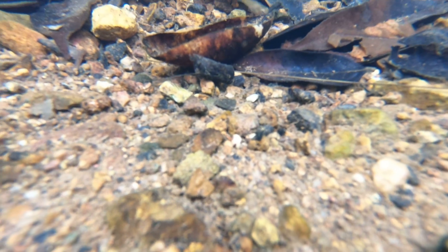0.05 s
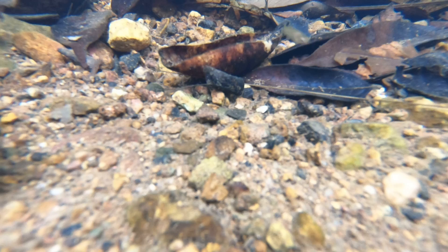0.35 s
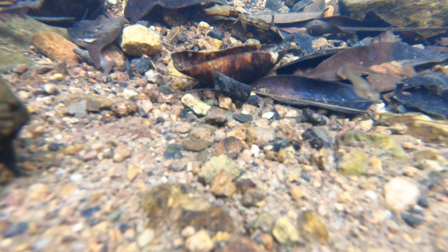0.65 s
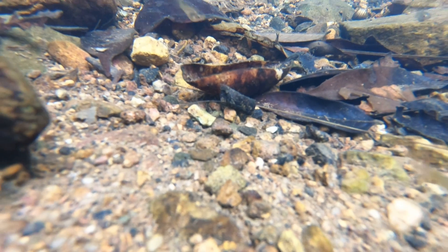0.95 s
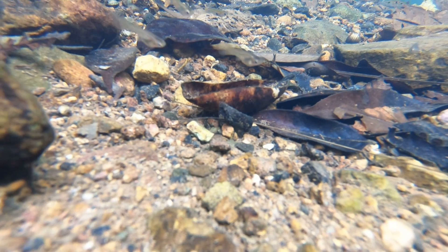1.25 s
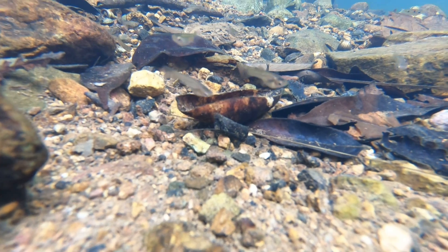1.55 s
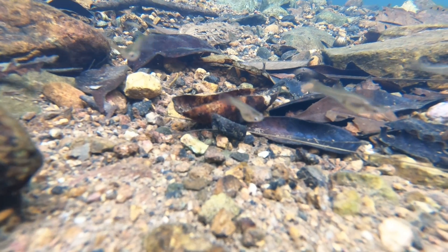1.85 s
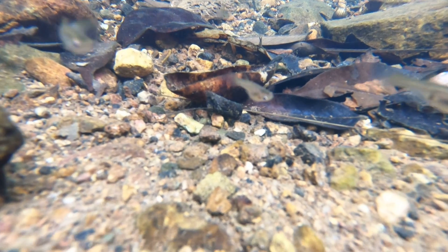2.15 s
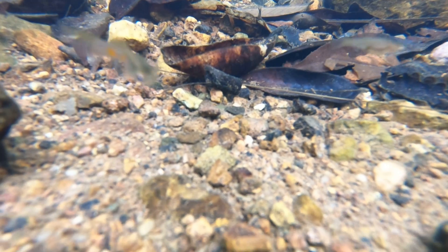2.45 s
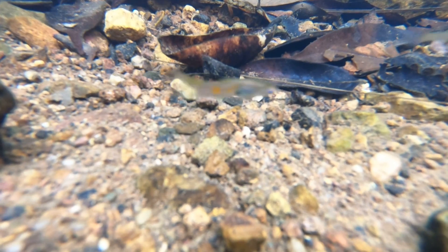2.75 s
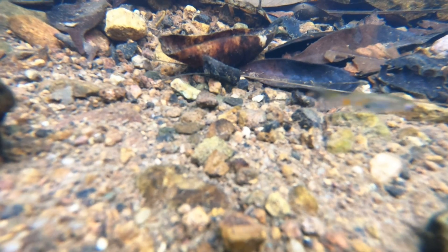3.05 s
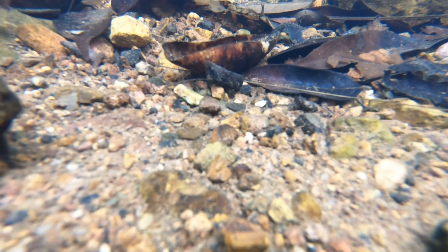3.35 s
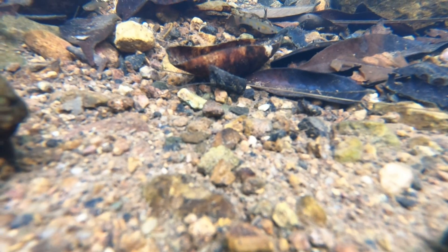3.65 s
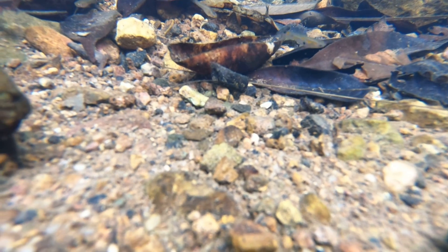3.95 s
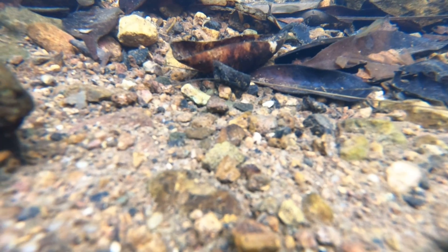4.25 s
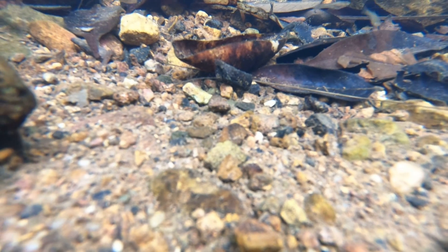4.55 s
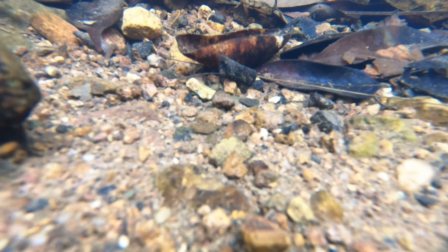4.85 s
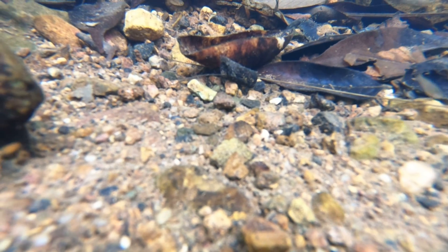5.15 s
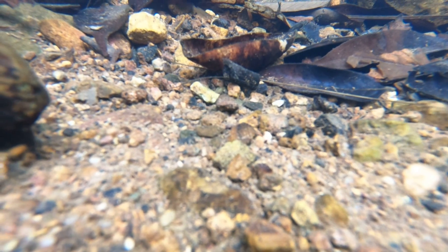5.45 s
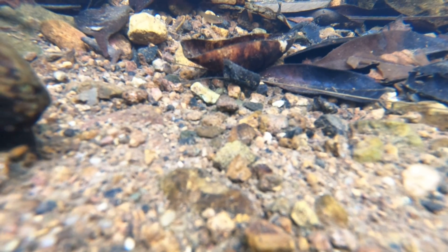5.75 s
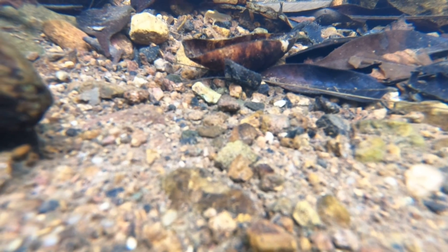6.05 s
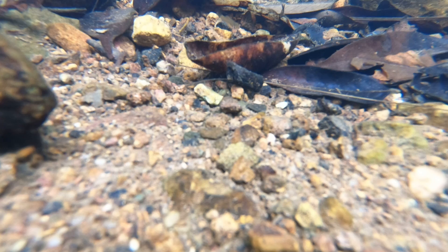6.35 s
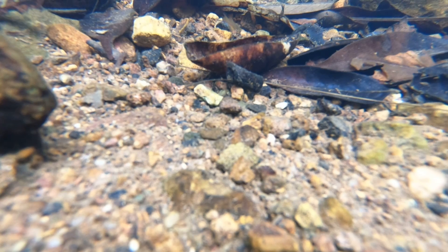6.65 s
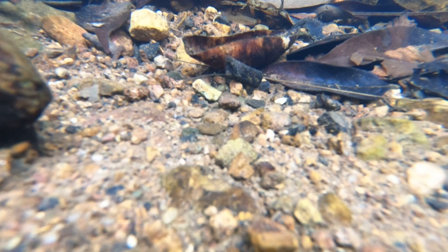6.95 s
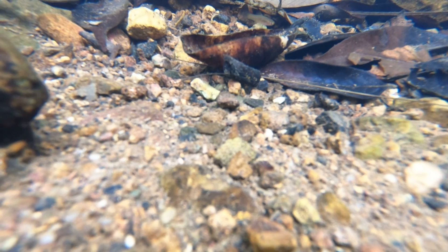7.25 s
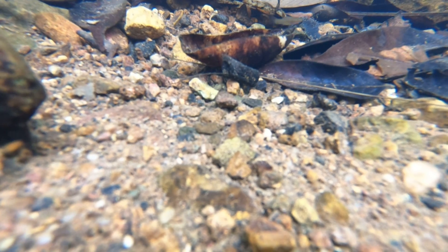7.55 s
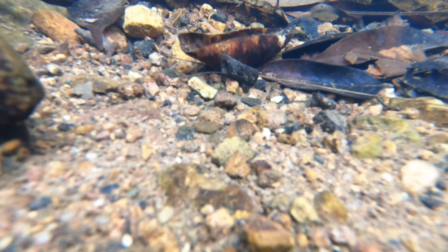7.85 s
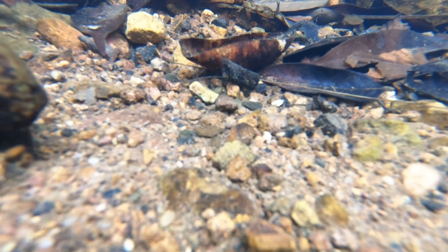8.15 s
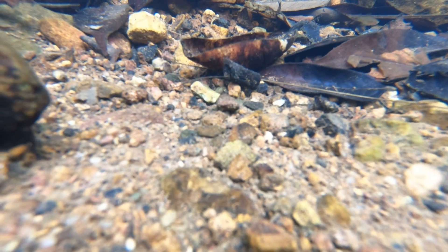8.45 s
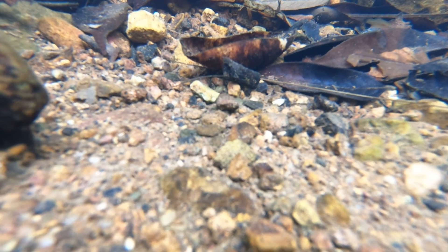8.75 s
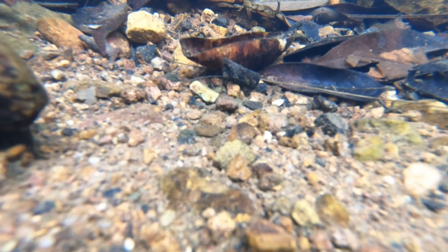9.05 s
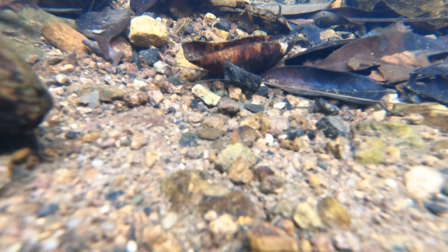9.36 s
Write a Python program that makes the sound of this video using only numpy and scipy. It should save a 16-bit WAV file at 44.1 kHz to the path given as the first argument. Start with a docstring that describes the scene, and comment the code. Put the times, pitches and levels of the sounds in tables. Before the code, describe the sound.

A hard knock and a bubbling surge open the sound, heard underwater from inside a waterproof camera case on the gravel bed of a shallow stream. Everything is close, muffled and boxy. Water gurgles and splutters in short, uneven surges, busiest during the first 2.4 seconds, over a low, wavering rumble. Throughout, big bubbles knock and gulp, small bubbles pop and fizz, and sand grains tick faintly on the shell. Sharper clicks come at about 0.9 and 1.9 seconds, and low buffeting shakes the case near 2.9 seconds. The bubbling continues, with a strong knock at 5 seconds, then eases around 5.5 seconds. A dull knock at about 6 seconds brings the churning back, and another hard knock lands near 7.5 seconds. After 8 seconds the flow is thinner, leaving scattered pops and a last few knocks around 9.3 seconds.

```python
"""A bubbling surge and a hard knock open the scene, heard from inside a waterproof camera case
on the gravel of a shallow stream. Air folded into each surge bursts, rings and fizzes; every
pressure kick rocks the case, which muffles it, adds its modes and disperses it into a falling chirp.
Eddies rumble on both microphone ports, big bubbles knock and gulp, sand ticks on the shell and
small bubbles pop. A faint hiss comes up near the end."""
import sys
import numpy as np
from scipy import signal
from scipy.fft import rfft, irfft
from scipy.io import wavfile
from scipy.ndimage import uniform_filter1d, minimum_filter1d, map_coordinates

SR = 44100
rng = np.random.default_rng(int(sys.argv[2]) if len(sys.argv) > 2 else 0)


def master(y):
    """Save y as 16-bit WAV."""
    cut = np.clip(np.atleast_2d(y).T, -1, 1)
    pcm = np.round(cut * 32767)  # scale
    wavfile.write(sys.argv[1], SR, pcm.astype(np.int16))


N = 414540
TIME = np.arange(N) / SR
SHELL_TOP_HZ = 3150  # upper edge of the band in which the shell rings


def undb(db):
    """Amplitude ratio of a level in decibels."""
    return 10 ** (np.asarray(db) / 20)


def unit(x):
    """Normalisation to rms 1."""
    return x / np.sqrt(np.mean(x ** 2))


def walk(rate):
    """Random modulation of rms 1, interpolated between rate values a second."""
    knots = rng.standard_normal(4096)
    return unit(map_coordinates(knots, [TIME * rate], order=1, mode="wrap"))


def butter(x, hz, kind, order=2):
    """Causal low-pass or high-pass filter."""
    return signal.sosfilt(signal.butter(order, min(hz, .45 * SR), kind, fs=SR, output="sos"), x)


def add(track, s, sound):
    """Superposition of a short sound on a track at time s."""
    start = max(int(s * SR), 0)
    part = track[..., start:start + sound.shape[-1]]
    part += sound[..., :part.shape[-1]]


def scatter(response, decay_s=0.002, treble_db=-2, edge_hz=3500, size=512):
    """Multipath propagation: treble runs round the shell on many paths and arrives as a soft spit."""
    paths = rng.standard_normal(size) * np.exp(-np.arange(size) / SR / decay_s)
    paths = rfft(paths / np.linalg.norm(paths), response.shape[-1])
    hz = np.maximum(np.fft.rfftfreq(response.shape[-1], 1 / SR), 1)
    share = 1 / (1 + (edge_hz / hz) ** 20)
    return irfft(rfft(response) * (1 - share + share * undb(treble_db) * paths))


# Transmission of the case wall: f/Hz, left level/dB, right level/dB
WALL_TRANSMISSION = [(47.7, -35, -29.5), (135, -21.5, -13), (185.5, -27, -5.5), (302, -20, -12),
                     (730, -20, -20.5), (1060, -18, -15), (1450, -24, -16.5), (1726, -46.5, -32.5),
                     (2710, -61.5, -55.5), (2900, -62, -68), (4070, -66, -62), (7040, -91, -72),
                     (8400, -94, -90.5), (14000.0, -102.0, -99.5)]
# Resonances of the case and its air: f/Hz, bandwidth/Hz, left lift/dB, right lift/dB
CASE_MODES = [(233, 65, 6.5, 8), (427, 179, 9.5, 12.5), (541.3, 253, 2.5, 8), (816.3, 178, 8.5, 9),
              (942, 363, 10.5, 12), (1110, 180, 2, -0.5), (2130, 720, 19.5, 8), (2740, 110, 9, 5),
              (5100, 700, -4.5, 8.5)]
# Rocking moves the ports in opposition until the shell flexes: f/Hz, left phase re right/rad
ROCKING_PHASE = [(260, -3.25), (900, -3.6), (1500, -3.9), (1650, -2.8), (2300, -2.65), (2600, -5.45),
                 (4000, -5.7)]
def case_response(lag_cycles=0.866, lag_low_hz=70, size=4096):
    """Impulse response at both ports: dispersion delays the low tones, so each kick falls in pitch."""
    hz = np.maximum(np.fft.rfftfreq(size, 1 / SR), 1)
    wall_hz, *sides_db = np.transpose(WALL_TRANSMISSION)
    db = np.array([np.interp(np.log(hz), np.log(wall_hz), side) for side in sides_db])
    for centre, width, *lift_db in CASE_MODES:
        db += np.outer(lift_db, 1 / (1 + (2 * (hz - centre) / width) ** 2))
    # minimum phase: the modes ring only after the kick
    cepstrum = irfft(np.log(undb(db[1])))
    cepstrum[1:size // 2] *= 2
    cepstrum[size // 2 + 1:] = 0
    lag = 2 * np.pi * lag_cycles * np.log((hz + lag_low_hz) / (hz + SHELL_TOP_HZ))
    right = np.exp(rfft(cepstrum) - 1j * lag)
    rocking = np.interp(hz, *np.transpose(ROCKING_PHASE))
    left = undb(db[0]) * np.exp(1j * (np.angle(right) + rocking))
    centred = np.roll(irfft(np.array([left, right])), size // 2, axis=1)
    return scatter(centred)


def transmit(push, case, split_hz=620):
    """Convolution carries pressure into the case; returns a low band (body) and a high one (splash)."""
    pushes = np.broadcast_to(push, (2, push.shape[-1]))
    inside = np.array([signal.fftconvolve(side, port, "same") for side, port in zip(pushes, case)])
    return [butter(butter(inside, split_hz, kind), split_hz, kind) for kind in ("low", "high")]


# Surges of air-laden water: t/s, duration/s, relative level/dB of big bubbles, small bubbles, fizz
SURGES = [(0, 0.088, -9, -27, -69), (0.122, 0.17, -23, -28, -77), (0.31, 0.091, -14, -27, -69.5),
          (0.447, .09, -15.5, -20, -56.5), (0.55, 0.091, -16.5, -24.5, -70), (0.7, 0.099, -16.5, -21, -71),
          (0.84, 0.11, -23, -25.5, -70.5), (0.978, 0.26, -20.5, -21.5, -63.5),
          (1.231, 0.06, -16, -19.5, -59.5), (1.345, 0.062, -16.5, -20.5, -63.5),
          (1.429, 0.076, -22.5, -25.5, -68.5), (1.513, 0.027, -28, -37, -79),
          (1.571, 0.028, -28, -31.5, -75), (1.644, 0.05, -38, -31.5, -76), (1.737, 0.29, -24, -26.5, -77.5),
          (1.801, 0.049, -16.5, -20, -65.5), (1.919, 0.11, -19.5, -25.5, -60.5),
          (2.029, 0.13, -16.5, -19.5, -61), (2.179, .15, -16.5, -17.5, -59.5),
          (2.349, 0.086, -21, -19.5, -66.5), (2.472, 0.05, -40, -37, -79), (2.619, 0.058, -25, -20.5, -68),
          (2.724, 0.074, -26, -25.5, -73.5), (2.813, .07, -35, -45.5, -72),
          (2.892, 0.094, -23.5, -19.5, -68.5), (3.072, 0.042, -30, -25.5, -73),
          (3.137, 0.011, -32, -22.5, -71.5), (3.204, 0.15, -20.5, -21.5, -68.5),
          (3.378, 0.038, -27, -28, -73), (3.452, 0.12, -21, -26.5, -68.5), (3.608, 0.04, -25.5, -28, -78),
          (3.748, 0.064, -30.5, -23, -76.5), (3.844, 0.15, -17.5, -20.5, -67.5),
          (4.026, 0.19, -26, -24, -74), (4.132, 0.11, -17.5, -24.5, -67.5),
          (4.278, 0.18, -18.5, -23, -63.5), (4.563, 0.21, -21, -20, -66), (4.809, 0.076, -22, -24.5, -66.5),
          (4.913, 0.044, -25, -25.5, -67), (5.095, 0.11, -20, -22.5, -67.5),
          (5.226, 0.072, -28.5, -31, -77), (5.436, 0.032, -27.5, -25.5, -72.5),
          (5.677, 0.066, -41.5, -39, -88), (5.801, 0.21, -36, -36, -88.5), (5.995, 0.21, -22, -27, -74),
          (6.208, 0.025, -29, -30, -66.5), (6.27, 0.17, -22, -28, -70), (6.51, 0.009, -17.5, -17, -66),
          (6.622, 0.0068, -17, -23, -68.5), (6.7, 0.031, -27, -24.5, -73.5),
          (6.772, 0.063, -22, -18.5, -61), (6.868, 0.23, -20.5, -21.5, -63.5),
          (7.18, 0.13, -19, -27, -66.5), (7.42, 0.19, -26.5, -26.5, -69.5),
          (7.582, 0.19, -29, -31.5, -72.5), (7.872, 0.035, -24.5, -28, -63),
          (7.956, 0.055, -24, -24, -68.5), (8.052, 0.11, -22.5, -24, -71), (8.301, 0.019, -26.5, -29, -77),
          (8.351, 0.095, -27.5, -35, -86.5), (8.508, 0.032, -30.5, -24, -73.5),
          (8.713, 0.055, -25, -24.5, -70), (8.897, 0.012, -25.5, -51, -92),
          (9.109, 0.049, -28.5, -28.5, -80.5), (9.324, 0.035, -26, -32, -79),
          (9.272, 0.063, -22, -27, -75.5)]
def surges(calm_db=(-41, -37, -86), calm_fade_db_per_s=(0.4, 0.5, 0.5),
           attack_s=0.024, release_s=(0.022, 0.016, 0.012)):
    """Incoherent sources add in power: envelopes of big bubbles, small bubbles and fizz over a calm."""
    power = undb(np.array(calm_db)[:, None] - np.outer(calm_fade_db_per_s, TIME)) ** 2
    t = np.arange(SR) / SR
    for s, length, *levels_db in SURGES:
        after = np.maximum(t - attack_s / 2 - length, 0)
        shape = np.minimum(t / attack_s, 1) * np.exp(-after / np.array(release_s)[:, None])
        add(power, s - attack_s / 2, (undb(levels_db)[:, None] * shape) ** 2)
    return np.sqrt(power)


def kicks(rate, spread_db):
    """Shot noise: pressure impulses at random moments, many small and a few large."""
    happens = rng.random(N) < rate / SR
    size = undb(spread_db * np.clip(rng.standard_normal(N), -2, 2))
    return unit(happens * size * rng.choice([-1, 1], N))


def bubbles(low_hz=297, high_hz=1610, cycles=7.8, rise=0.28, spread_db=17, count=1400):
    """Damped oscillation: newborn bubbles ring, rising in pitch as they near the surface."""
    out = np.zeros(N)
    for when, pitch, strength, sustain in rng.random((count, 4)):
        hz = low_hz * (high_hz / low_hz) ** pitch
        life = cycles * (.5 + sustain) / hz
        t = np.arange(int(life * SR)) / SR
        ring = np.sin(2 * np.pi * hz * t * (1 + rise * t / life / 2)) * undb(-40 * t / life)
        add(out, when * N / SR, ring * undb(spread_db * strength))
    return unit(out)


def current(case, big, small, cloud, thin_db=-33.5, dense_db=-20, thin_flurry_db=6, dense_flurry_db=3.5):
    """Forced vibration: bubbles shake the case, spluttering in weak flow, as a wash in strong flow."""
    dense = np.clip((20 * np.log10(small) - thin_db) / (dense_db - thin_db), 0, 1)
    depth_db = thin_flurry_db + dense * (dense_flurry_db - thin_flurry_db)
    flurry = undb(depth_db * np.tanh(0.74 * walk(130)))
    splutter = np.sqrt(1 - dense) * kicks(rate=520, spread_db=4.5)
    wash = np.sqrt(dense) * kicks(rate=1200, spread_db=4.5)
    push = splutter + wash + undb(-17.5) * bubbles()
    # some kicks land beside one port only
    local = np.array([undb(-11) * kicks(rate=810, spread_db=2),
                      undb(-14.5) * kicks(rate=980, spread_db=3)])
    body, splash = transmit((push + local) * flurry, case)
    churn = undb(-1) * big * unit(body) + undb(-2) * small * unit(splash)
    return churn + undb(-0.5) * unit(flurry ** 1.7) * fizz(cloud)


# Finest spray within the fizz: t/s, relative level/dB
SPRAY_LEVEL = [(0, -9), (0.25, -8), (0.5, -17), (0.8, -18.5), (1.15, -14.5), (1.5, -14.5), (2.08, -14.5),
               (2.25, -24), (2.8, -14), (3.25, -15.5), (4.2, -13.5), (5.15, -15.5), (5.8, -7), (6.4, -18),
               (6.8, -18.5), (6.93, -16), (7.2, -16), (8.1, -13), (9.3, -11)]
def fizz(cloud, spray_left_db=-7):
    """Impulse excitation: tiny bubbles ring the shell near 2 and 3 kHz; dense clouds add finer spray."""
    shared = kicks(rate=400, spread_db=3.5)
    crackle = shared + 0.62 * np.array([kicks(rate=950, spread_db=2.5) for _ in range(2)])
    upper_ring = unit(butter(butter(crackle, 2500, "high", order=6), SHELL_TOP_HZ, "low", order=12))
    lower_ring = unit(butter(butter(crackle, 1750, "high", order=4), 2200, "low", order=6))
    mist = crackle + rng.standard_normal((2, N))
    mist = butter(butter(mist, 4300, "high", order=3), 7200, "low", order=10)
    spray = unit(undb([[spray_left_db], [0]]) * mist)
    spray_db = np.interp(TIME, *np.transpose(SPRAY_LEVEL)) + 1.2 * walk(8.2)
    return cloud * (upper_ring + lower_ring + undb(spray_db) * unit(cloud) ** .1 * spray)


def eddies(big, sides_db=(-19.5, -17.5), follow_db_per_db=0.68, smooth_s=0.0063, waver_db=3):
    """Turbulent pressure: swirls follow the surges and rumble on each port, partly on both at once."""
    swirl = butter(rng.standard_normal((3, N)), 70, "low", order=1)
    *ports, shared = butter(butter(swirl, 125, "low", order=3), 25, "high")
    stir = uniform_filter1d(big, int(smooth_s * SR)) ** follow_db_per_db * undb(waver_db * walk(10))
    return np.array([undb(db) * stir * unit(own + shared) for db, own in zip(sides_db, ports)])


def drone(level_db=-39, low_hz=11, high_hz=44.4, shared=0.99):
    """Stationary low-frequency noise: the whole stream presses on both ports, even in the lulls."""
    sway = butter(butter(rng.standard_normal((3, N)), high_hz, "low", order=4), low_hz, "high")
    return undb(level_db) * unit(sway[:2] + shared * sway[2])


def resonance(t, hz, cycles):
    """Impulse response of a bubble: a damped cosine that falls 40 dB in the given cycles."""
    fade = np.exp(-np.log(100) * t * hz / cycles)
    return 2 * np.cos(2 * np.pi * hz * t) * fade / fade.sum()


def strike(track, s, push, case, peaks_db):
    """Transmission of one transient: body and splash are mixed in, scaled by their right-hand peaks."""
    lead = len(push)
    for band, db in zip(transmit(np.pad(push, (lead, 0)), case), peaks_db):
        add(track, s - lead / SR, undb(db) * band / np.abs(band[1]).max())


# Air pockets breaking near the case: t/s, break-up time/s, f/Hz, relative level/dB of body, splash
AIR_POCKETS = [(0.002, 0.0063, 450, 8, -1), (0.064, 0.023, 440, -7, -12.5), (0.096, 0.0043, 260, -3.5, -22),
               (0.151, .004, 213, -2, -15), (0.191, 0, 330, 2, -15), (0.246, 0.018, 420, -2, -17),
               (0.3255, 0, 560, -6.5, -0.5), (0.337, 0.0038, 380, -2, -12), (0.422, 0.013, 490, 0.5, -6.5),
               (0.463, .006, 420, -5.5, -10.5), (0.512, 0.0089, 440, -0.5, -9), (0.5279, .005, 950, -8, 0),
               (0.668, 0.0047, 1060, -18, -9), (0.699, 0.0041, 220, -4.5, -12.5),
               (0.892, 0.0053, 3160, -5.5, -1.5), (0.966, 0.0044, 1040, -7.5, -10),
               (1.246, 0.0081, 1130, -11, -0.5), (1.486, 0.011, 2620, -2.5, -5),
               (1.636, 0.0015, 950, -18.5, -14), (1.681, 0.0028, 480, -10, -15), (1.739, 0, 337, -13, -11),
               (1.891, 0.0083, 2650, -0.5, -4.5), (1.993, 0, 450, 3, -21), (2.532, 0, 767, -20.5, -17.5),
               (2.645, 0.013, 580, -12, -10.5), (2.879, 0.003, 1500, -15, -8),
               (2.963, 0.006, 1170, -8, -5.5), (3.071, 0.012, 510, -12.5, -23),
               (3.133, 0.0036, 910, -10.5, -5.5), (3.186, 0.0017, 1010, -9.5, -1.5),
               (3.613, 0.0051, 385, -5.5, -11), (3.676, 0.0052, 484, -8.5, -13.5),
               (3.804, 0.0083, 660, -9.5, -2), (3.863, 0.0073, 440, -2, -5), (4.164, 0.0023, 410, -3, -8),
               (4.262, 0.0029, 1320, -21, -3.5), (4.423, 0.008, 820, -23, -2.5),
               (4.507, 0.0035, 634, -21, -12), (4.531, 0.003, 1100, -16, -15),
               (4.546, 0.00021, 507, -2.5, -13), (4.65, .008, 260, -2, -3), (4.78, 0.015, 245, -4.5, -7.5),
               (5.006, 0.0074, 700, 5.5, -2.5), (5.119, 0.0038, 220, -11, -13.5),
               (5.137, 0.0056, 380, -0.5, -12), (5.248, 0.0063, 226, -3, -12.5),
               (5.315, .0074, 1280, -18, -12), (5.367, 0.013, 560, -15.5, -9),
               (5.483, 0.016, 1540, -9.5, -16), (5.544, 0.0035, 900, -18.5, -10.5),
               (5.606, 0.0027, 820, -17, -9), (5.753, 0.0072, 780, -16.5, -11),
               (5.828, 0.005, 750, -10.5, -13), (5.912, 0.014, 334, -18, -16),
               (5.968, 0.013, 905, -10, -11.5), (6.08, 0.0043, 390, 6, -16), (6.249, 0.012, 355, -4.5, -11),
               (6.346, 0.0033, 850, -4.5, -7), (6.388, 0.0011, 2800, -20, -8),
               (6.412, 0.00045, 620, -10, -8.5), (6.507, 0.0064, 680, -16, -17),
               (6.594, .0033, 2130, -34, -14), (6.77, 0, 1090, -8.5, -11.5), (7.07, 0.0045, 332, -8, -19),
               (7.154, 0, 1700, -13.5, -11.5), (7.203, 0.012, 2260, -2.5, -6),
               (7.36, 0.0079, 765, -24, -16.5), (7.407, 0, 900, -5.5, -4), (7.4686, 0.0014, 520, 4.5, 4.5),
               (7.623, 0.0028, 900, -15, -7.5), (7.75, 0.0097, 1100, -8.5, -3.5),
               (7.814, 0.0003, 880, -37, -13), (7.867, 0.0042, 1560, -11, -8.5), (7.894, 0, 2290, -5.5, -6),
               (7.998, 0.003, 1290, -5, -4.5), (8.066, 0, 400, -8, -14), (8.195, 0.0043, 410, -11, -16.5),
               (8.232, 0.00054, 850, -21, -16.5), (8.341, 0.0038, 520, -4, -9.5),
               (8.546, 0, 2220, -10, -6.5), (8.668, 0, 1220, -31, -22), (8.682, 0.0011, 305, -4, -11.5),
               (8.888, 0.0017, 1450, -14.5, -10), (8.906, .0037, 288, -14.5, -22),
               (8.993, 0.017, 734, -24, -18), (9.114, 0.001, 1100, -10, -7.5), (9.3, 0.0033, 413, -1, -8),
               (9.316, 0.00029, 260, -2, -10)]
def knocks(case, strays, fragments_db=-7, cycles=3.2, ring_db=1, crack_db=-45, size=2048, count=8):
    """Cavity collapse: one hard kick cracks on the shell and rings briefly; fragments follow it."""
    out = np.zeros((2, N))
    t = np.arange(size) / SR
    for s, length, hz, body_db, splash_db in list(AIR_POCKETS) + strays:
        push = np.zeros(size)
        fragments = (rng.random(count) * np.clip(length * SR, 0, size - 1)).astype(int)
        push[fragments] = undb(fragments_db) * rng.standard_normal(count)
        push[0] = 1
        push += undb(ring_db) * signal.fftconvolve(push, resonance(t, hz, cycles))[:size]
        strike(out, s, push, case, (body_db, splash_db))
        crack = butter(butter(push, 1500, "high", order=4), SHELL_TOP_HZ, "low", order=12)
        add(out, s, undb(splash_db + crack_db) * crack / np.abs(crack).max())
    return out


def wobbles(sides_db=(-24.5, -17.5), low_hz=50, high_hz=95, start_hz=190,
            glide_s=0.0082, decay_s=0.014, rise_s=0.008, size=4096):
    """Damped sloshing: after each listed knock the water sways the case, slowing as it dies away."""
    out = np.zeros((2, N))
    t = np.arange(size) / SR
    for (s, _, _, body_db, _), pitch in zip(AIR_POCKETS, rng.random(len(AIR_POCKETS))):
        end_hz = low_hz * (high_hz / low_hz) ** pitch
        hz = end_hz + (start_hz - end_hz) * np.exp(-t / glide_s)
        envelope = np.exp(-t / decay_s) * np.tanh(t / rise_s) ** 2
        sway = np.sin(2 * np.pi * np.cumsum(hz) / SR) * envelope
        add(out, s, np.outer(undb(sides_db), undb(body_db) * sway))
    return out


def stray_pockets(big, small, low_hz=400, high_hz=1800, longest_s=0.0033,
                  offsets_db=(0, -6), follow_db_per_db=0.56, spread_db=7, count=8):
    """Power-law scaling: faint air pockets break at random, harder where the current is strong."""
    rows = []
    for when, length, pitch, strength in rng.random((count, 4)):
        i = int(when * N)
        hz = low_hz * (high_hz / low_hz) ** pitch
        flow_db = 20 * np.log10([big[i], small[i]])
        peaks_db = follow_db_per_db * flow_db + offsets_db + spread_db * (strength - .5)
        rows.append((i / SR, length * longest_s, hz, *peaks_db))
    return rows


# Sand grains hitting the case: t/s, relative level/dB
SAND_GRAINS = [(0.098, -60), (0.193, -58), (0.243, -62), (0.292, -62), (0.327, -55.5), (0.341, -52),
               (0.422, -52), (0.503, -64), (0.891, -48.5), (1.16, -52), (1.214, -54), (1.294, -63),
               (1.4, -61), (1.419, -61), (1.490, -49), (1.892, -42.5), (1.938, -54), (1.952, -53),
               (2.047, -54), (2.093, -53), (2.145, -61), (2.654, -62), (2.79, -62), (2.908, -58),
               (2.957, -64), (3.133, -57), (3.177, -56), (3.215, -60), (3.23, -52), (3.463, -58),
               (3.502, -56), (3.536, -61), (3.613, -55), (3.854, -55), (4.213, -59), (4.61, -60),
               (4.743, -51), (4.858, -60), (5.118, -58), (5.207, -69), (5.979, -61), (6.041, -47.5),
               (6.182, -66), (6.326, -57), (6.389, -53.5), (6.887, -48), (6.916, -57), (6.958, -55),
               (6.99, -58), (7.211, -57), (7.409, -55.5), (7.505, -64), (7.868, -54), (7.893, -61),
               (8.0005, -45.5), (8.085, -55), (8.168, -61), (8.349, -64), (8.547, -69), (9.317, -68)]
def sand(gain_db=3, decay_s=0.0023, bright_hz=5800, edge_hz=7600, leak_db=-8,
         ring_hz=2650, ring_s=0.0025, size=1024):
    """Direct impact: sand strikes the shell itself, so its tick keeps some treble and rings briefly."""
    out = np.zeros((2, N))
    t = np.arange(size) / SR
    for s, db in SAND_GRAINS:
        tick = butter(rng.standard_normal((2, size)) * np.exp(-t / decay_s), bright_hz, "low")
        leak = undb(leak_db) * butter(tick, edge_hz, "high", order=4)
        tick = butter(tick, edge_hz, "low", order=12) + leak
        hz = ring_hz * (1 + 0.13 * rng.uniform(-1.2, 1))
        ring = np.sin(2 * np.pi * hz * t) * np.exp(-t / ring_s)
        add(out, s, undb(db + gain_db) * (tick / np.abs(tick).max() + undb(1) * ring))
    return out


# Small bubbles bursting on the case: t/s, relative level/dB of body, splash
BUBBLE_POPS = [(0.1105, -13, -20), (0.3027, -18.5, -13), (0.502, -9.5, -11), (0.532, -22, -4),
               (0.6044, -5.5, -23), (0.6135, -12, -5.5), (0.7979, -14.5, -24), (0.9935, -18.5, -13),
               (1.1197, -4, -11), (1.3541, -14, -14), (1.549, -28, -28), (1.58, -15, -29),
               (1.598, -20, -28), (1.666, -22, -21), (1.696, -27, -26), (1.723, -25, -20.5),
               (1.7768, -20, -11), (1.7911, -21, -8.5), (1.955, -13, -6.5), (2.037, -12, -9),
               (2.228, 2.5, -7), (2.4292, -22, -8), (2.485, -29, -31), (2.5667, -29, -28),
               (2.6263, -28, -36), (2.7679, -11, -18), (2.9263, -24, -14), (2.9937, -30, -10.5),
               (3.02, -22.5, -24.5), (3.1032, -20, -19), (3.1762, -12, -8), (3.2288, -12, -5),
               (3.3575, -7, -12), (3.439, -27, -9.5), (3.4665, -10.5, -9.5), (3.5517, -26, -6),
               (3.727, -27, -20.5), (3.746, -21, -18), (3.7946, -13, -7.5), (3.949, -14, -9),
               (4.053, -7.5, -9), (4.079, -11, -17.5), (4.1107, -5.5, -10.5), (4.329, -19.5, -4.5),
               (4.3646, -12, -15), (4.613, -17, -18), (4.7655, -16, -15), (4.8472, -23, -7.5),
               (4.915, -18, -22), (4.938, -7, -25), (4.9521, -26.5, -10.5), (4.9953, -17.5, -20),
               (5.0762, -20.5, -17.5), (5.34, -18, -19), (5.4736, -14, -12), (5.7, -20, -25),
               (5.845, -24, -20), (5.9392, -17.5, -20), (6.044, -16, -8.5), (6.1815, -14, -11),
               (6.2193, -12, -12), (6.2907, -22, -5), (6.31, -23, -8.5), (6.3264, -8, -10.5),
               (6.4643, -18, -18.5), (6.4867, -35, -24), (6.54, -9, -9), (6.644, -28.5, -9),
               (6.6961, -11.5, -16.5), (6.786, -6, -9), (6.8871, -21, -7), (6.9255, -13, -13),
               (7.0014, -4.5, -8.5), (7.1705, -5.5, -13), (7.194, -9, -9.5), (7.2207, -7.5, -10),
               (7.2756, -23, -23), (7.504, -16, -14), (7.5417, -8.5, -11), (7.5604, -21, -22),
               (7.5871, -11, -17), (7.6069, -22, -13), (7.69, -25.5, -12), (7.729, -24, -10.5),
               (7.9407, -25, -14), (8.0995, -9, -7.5), (8.1669, -24, -12), (8.3927, -16, -27),
               (8.4653, -31.5, -21), (8.528, -23, -9.5), (8.5628, -24, -12), (9.0168, -23, -20),
               (9.1281, -20, -15), (9.157, -30, -23), (9.2321, -26, -12), (9.257, -34, -12.5)]
def pops(case, offsets_db=(-2, -0.5), low_hz=450, high_hz=1500, cycles=4, ring_db=-2, size=2048):
    """Bubble resonance: a small bubble bursts in one clean kick, coloured by its size."""
    out = np.zeros((2, N))
    t = np.arange(size) / SR
    for (s, *peaks_db), pitch in zip(BUBBLE_POPS, rng.random(len(BUBBLE_POPS))):
        hz = low_hz * (high_hz / low_hz) ** pitch
        push = (t == 0) + undb(ring_db) * resonance(t, hz, cycles)
        strike(out, s, push, case, np.add(peaks_db, offsets_db))
    return out


# Single shoves of water against the ports: t/s, f/Hz, left level/dB, right level/dB
BUFFETS = [(0.339, 135, -24, -14), (0.423, 59.5, -11, -13.5), (0.469, 140, -24, -11),
           (0.521, 58.5, -34, -11), (0.569, 140, -25, -10), (0.635, 150, -21, -12), (1.303, 98, -21, -11.5),
           (2.322, 60.3, -21, -16), (2.783, 70, -37, -7), (2.821, 70, -12, -29), (2.835, 115, -18.5, -28),
           (2.85, 93, -15, -25), (2.866, 105, -14, -30), (2.88, 83, -8, -28), (2.907, 58.5, -5, -33),
           (2.923, 85, -17, -29), (3.205, 70, -18, -18.5), (4.362, 46.6, -21, -11.5), (4.56, 77, -19, -21),
           (4.658, 78, -19.5, -17), (4.806, 90, -23, -25), (5.014, 116, -17, -17), (5.123, 145, -19, -11),
           (6.42, 58.5, -15.5, -22), (7.175, 125, -30, -23), (7.208, 120, -17.5, -15),
           (7.479, 130, -24, -8), (7.493, 104, -15.5, -13), (7.511, 115, -28, -17), (7.767, 99, -26, -24),
           (8.936, 49.5, -17.5, -23), (9.332, 94, -11, -17)]
def buffets(width_cycles=0.45, size=4096):
    """Buffeting: a swirl hits the case and sways it for a cycle or two under a bell-shaped envelope."""
    out = np.zeros((2, N))
    t = (np.arange(size) - size // 2) / SR
    for s, hz, *sides_db in BUFFETS:
        sway = np.sin(2 * np.pi * hz * t) * np.exp(-(t * hz / width_cycles) ** 2)
        add(out, s + t[0], np.outer(undb(sides_db), sway))
    return out


# Faint high hiss that comes up between the last knocks: t/s, level/dB
HISS_LEVEL = [(0, -104), (5.5, -102), (8.1, -100), (8.6, -89), (9.1, -87), (9.3, -89), (9.38, -102)]
def hiss(low_hz=3200, high_hz=6200, top_hz=11000, flicker_db=2.5, floor_db=-103):
    """Amplitude-modulated noise: a high band flickers over a steady white floor."""
    noise = butter(butter(rng.standard_normal((2, N)), low_hz, "high"), high_hz, "low")
    noise = butter(noise, top_hz, "low", order=6) * undb(flicker_db * walk(45))
    envelope = undb(np.interp(TIME, *np.transpose(HISS_LEVEL)))
    return envelope * unit(noise) + undb(floor_db) * rng.standard_normal((2, N))


def scene():
    """Superposition of current, knocks, pops, rumble, sand and hiss inside the case."""
    case = case_response()
    big, small, cloud = surges()
    strays = stray_pockets(big, small)
    rumble = eddies(big) + buffets() + wobbles() + drone()
    bubbling = current(case, big, small, cloud) + undb(-2.5) * knocks(case, strays) + pops(case)
    return bubbling + rumble + sand() + hiss()


def record(dry, ceiling=.93, top_hz=15500, size=400):
    """Peak limiting: the camera lowers its gain around the highest peaks, then cuts the top treble."""
    allowed = ceiling / np.maximum(np.abs(dry).max(axis=0), ceiling)
    held = minimum_filter1d(allowed, 2 * size)
    gain = uniform_filter1d(uniform_filter1d(held, size), size)
    return signal.sosfilt(signal.ellip(8, .2, 70, top_hz, fs=SR, output="sos"), gain * dry)


dry = scene()
out = record(dry)
master(out)
```